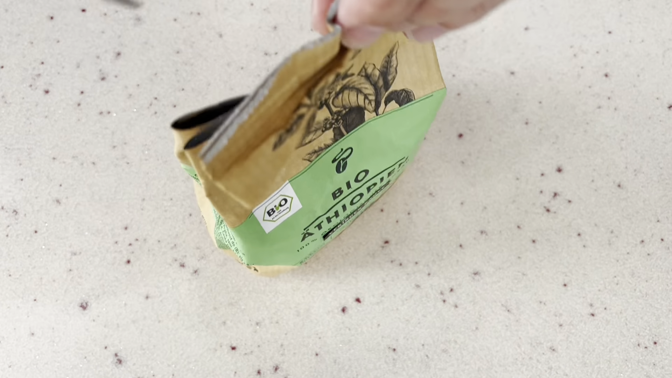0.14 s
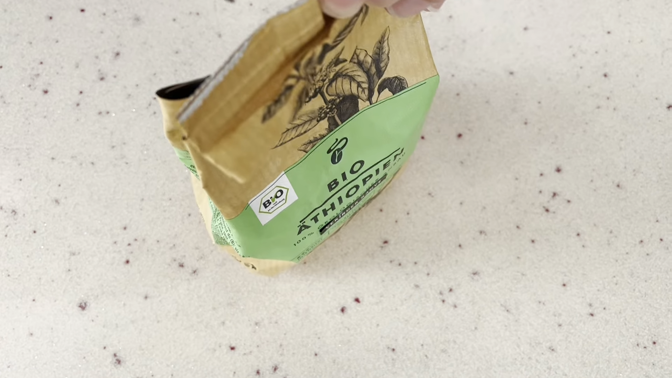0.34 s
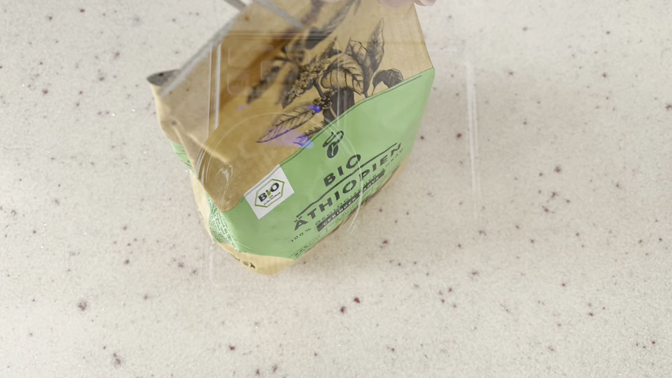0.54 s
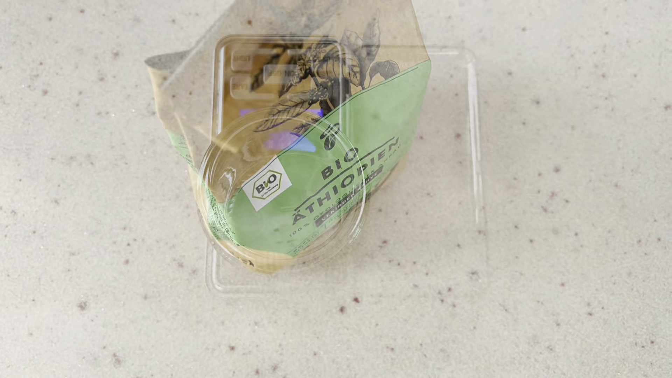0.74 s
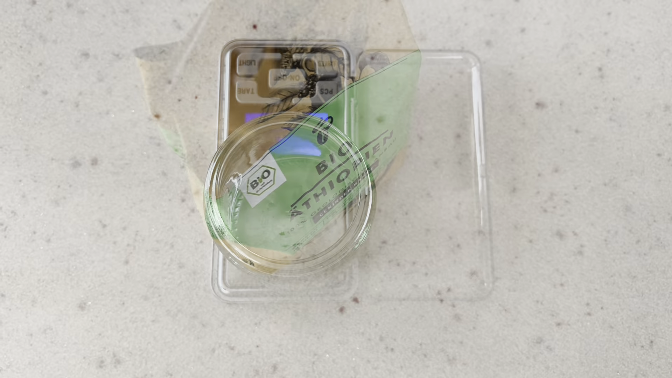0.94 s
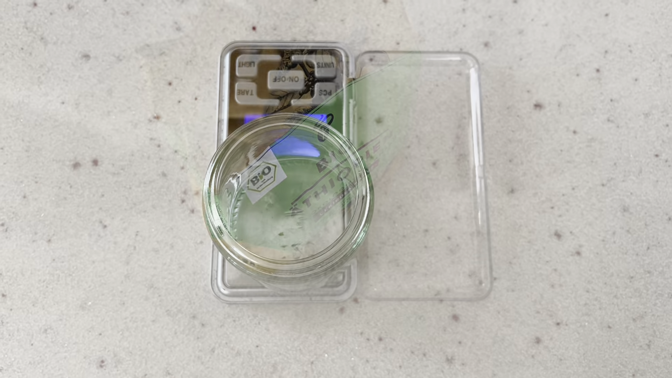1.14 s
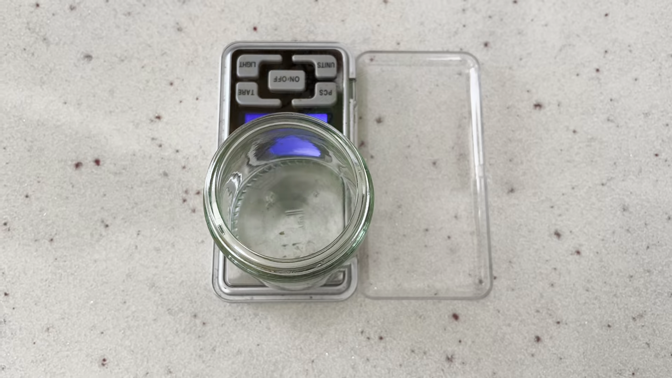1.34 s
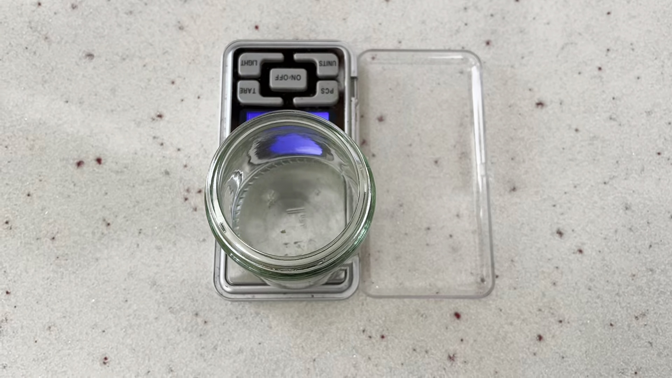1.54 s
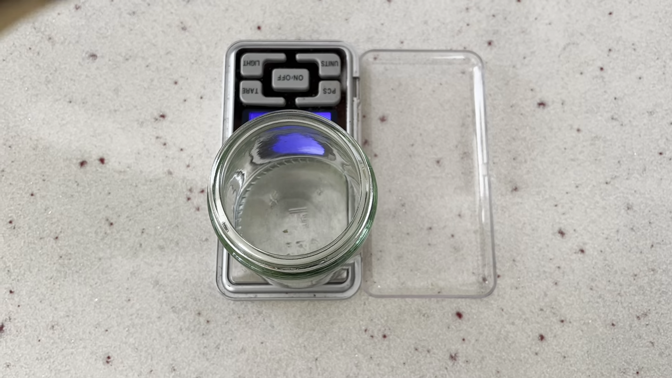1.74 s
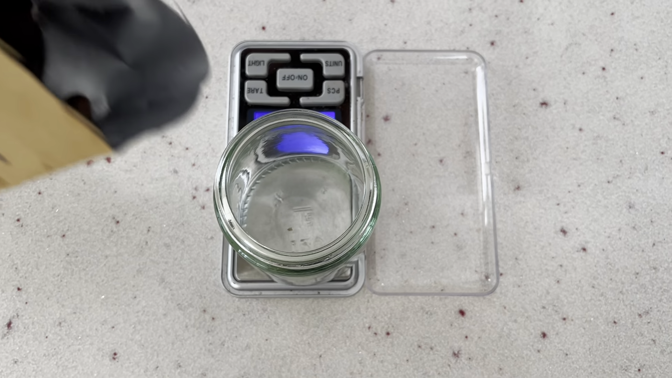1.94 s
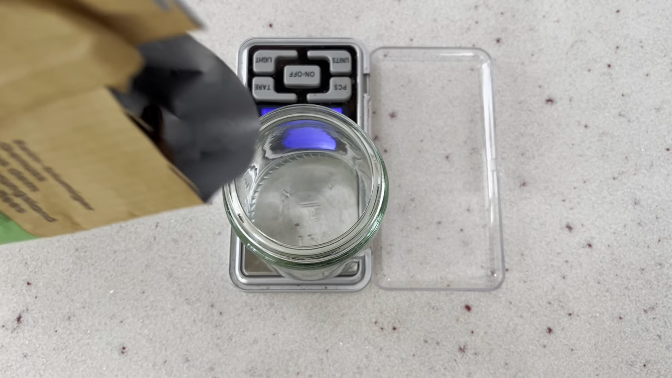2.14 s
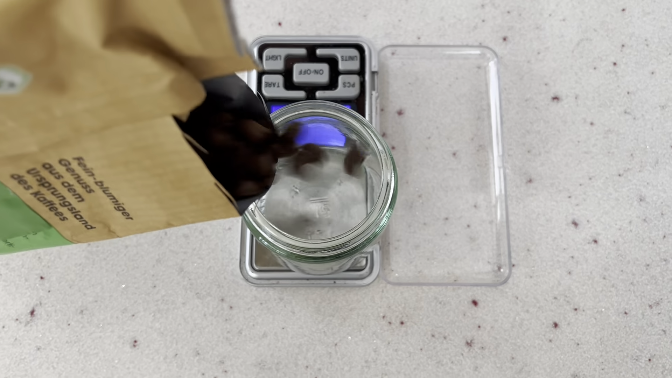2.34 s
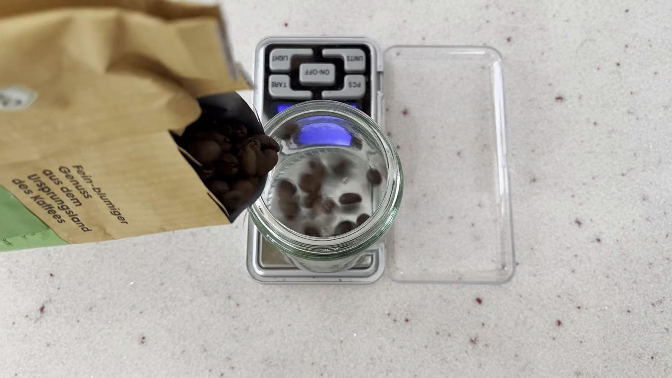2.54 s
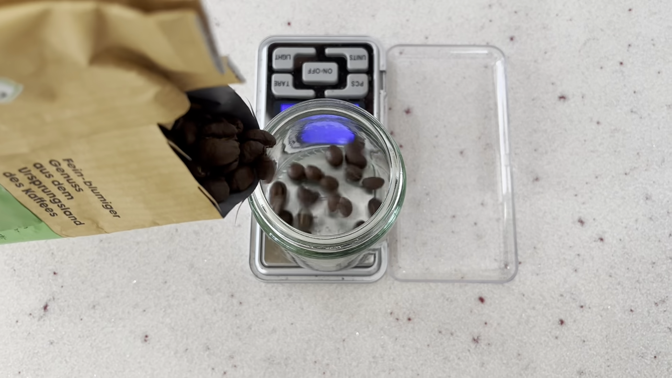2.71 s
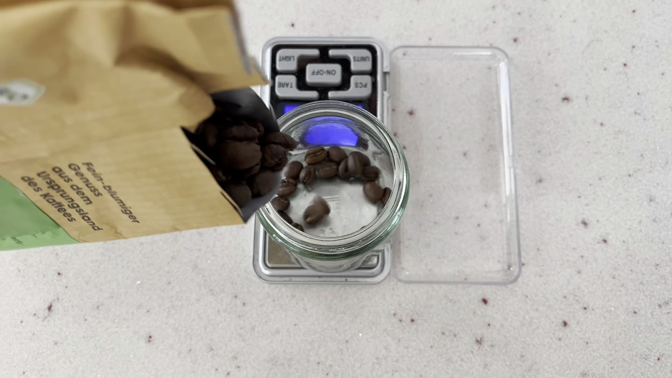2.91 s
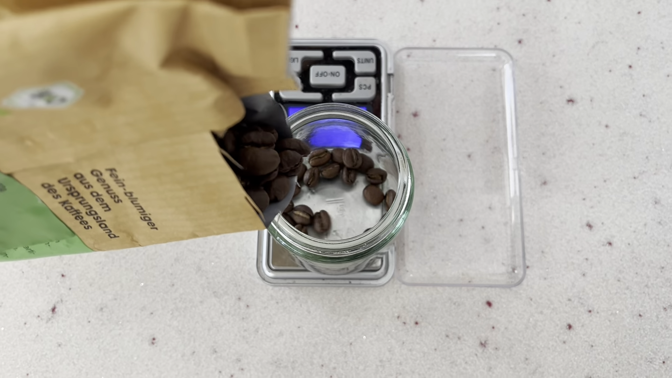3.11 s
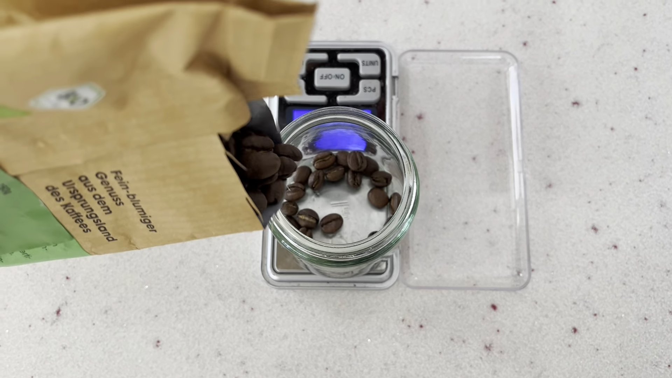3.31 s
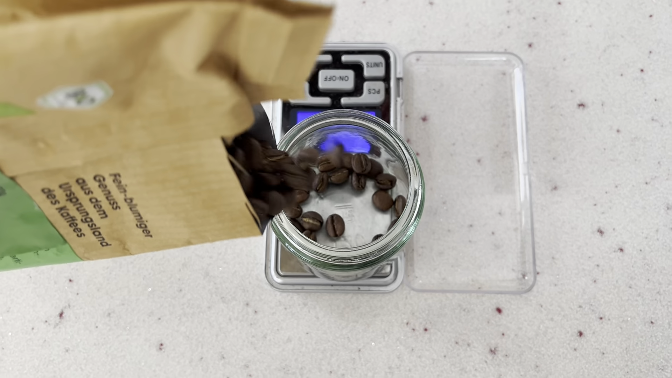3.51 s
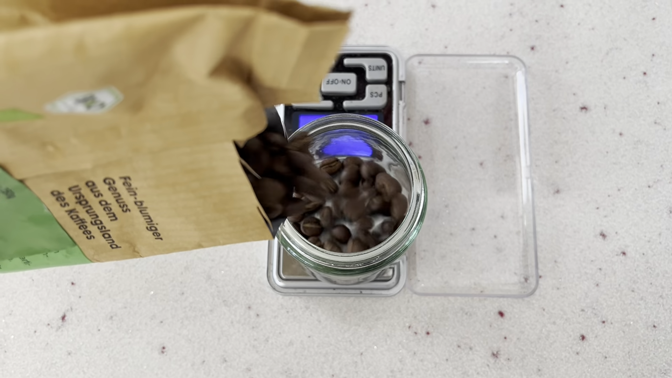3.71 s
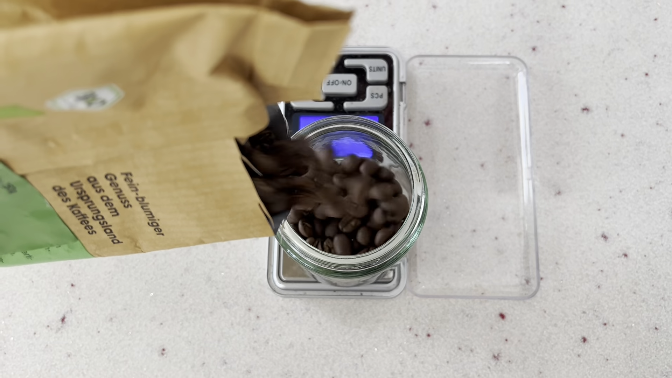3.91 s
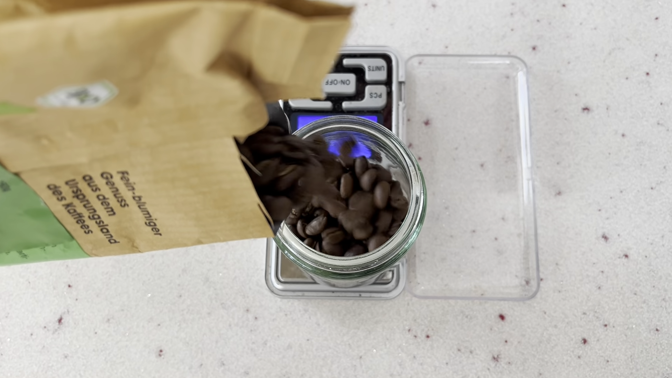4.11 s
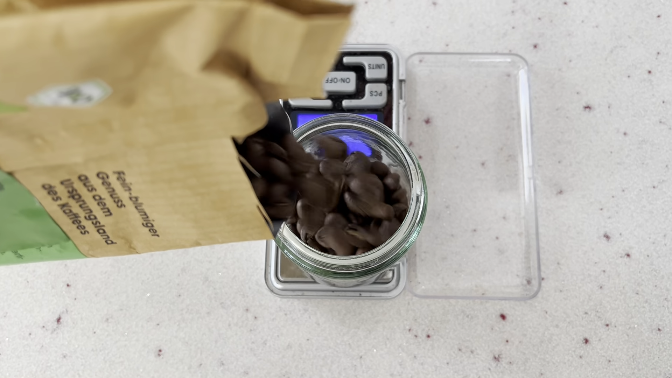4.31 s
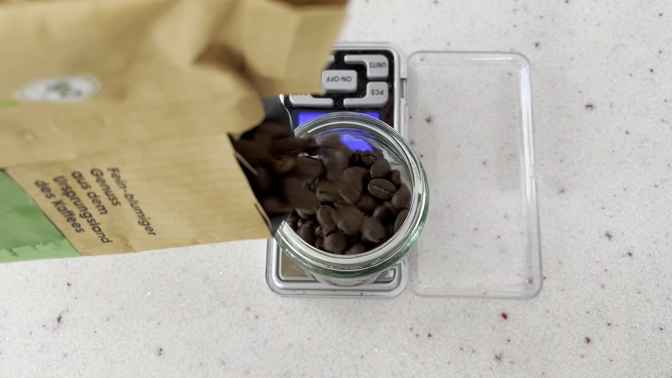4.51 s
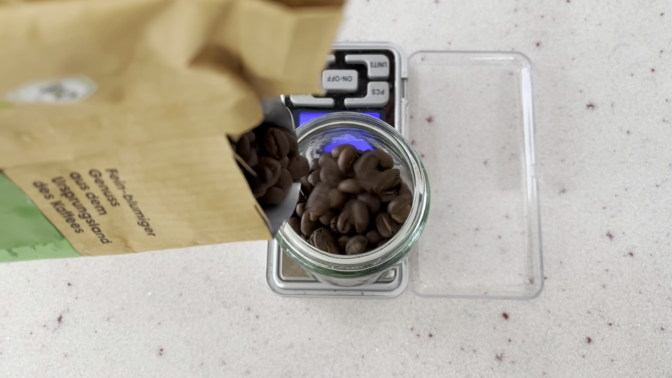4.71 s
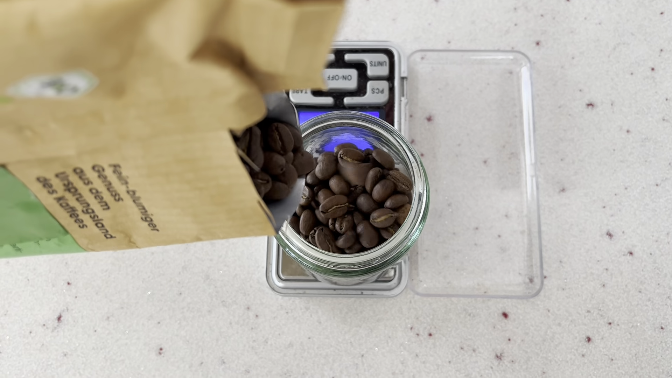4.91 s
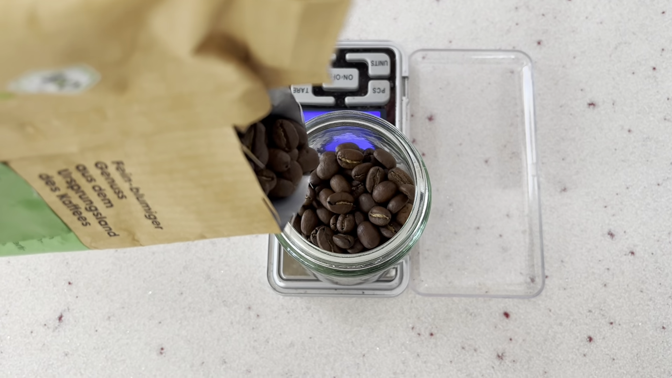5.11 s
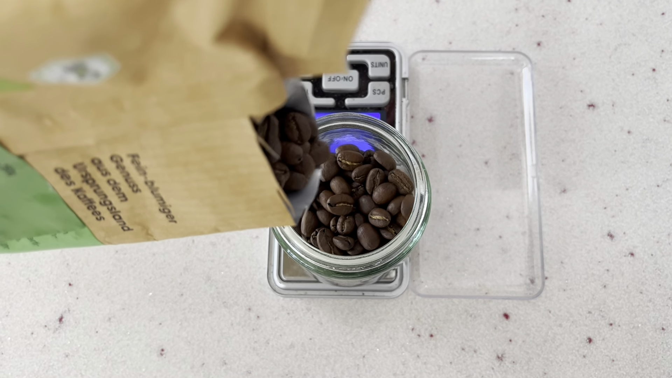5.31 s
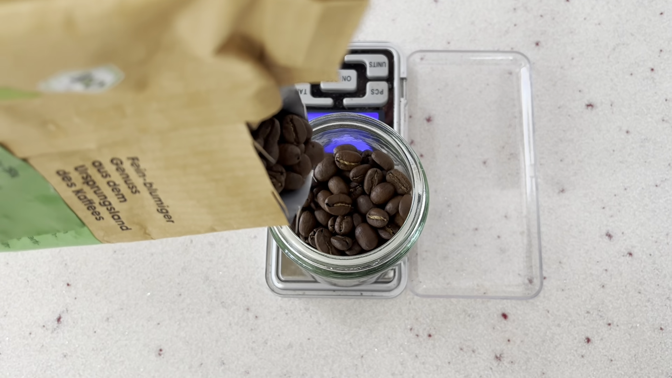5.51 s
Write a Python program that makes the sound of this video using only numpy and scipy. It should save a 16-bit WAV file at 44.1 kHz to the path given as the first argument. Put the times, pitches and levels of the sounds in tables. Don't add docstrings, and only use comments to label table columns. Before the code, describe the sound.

Close stereo pickup of coffee beans going from a crackly paper bag into a small glass jar on a worktop. Quiet finger strokes come first, then louder folding and sliding beans. A brief dense clatter rings the empty glass, a few beans roll to rest, then a second, longer gush fills it, its ring fading into dry clicks. Last beans settle and paper crackles softly in the quiet, barely reverberant kitchen.

```python
import sys
import numpy as np
from scipy import signal
from scipy.fft import rfft, irfft, next_fast_len
from scipy.io import wavfile
from scipy.ndimage import map_coordinates

SR = 44100
rng = np.random.default_rng(int(sys.argv[2]) if len(sys.argv) > 2 else 0)


def transcribe(u):
    v = np.clip(np.atleast_2d(u).T, -1, 1)
    q = np.round(v * 32767).astype(np.int16)
    wavfile.write(sys.argv[1], SR, q)


def amplitude_ratio(level_db):
    exponent = np.asarray(level_db, float) / 20
    return 10 ** exponent


N = 244755
TIME_S = np.arange(N) / SR

# start_s, click_db, base_ring_db after it
FIRST_POUR = [(2.3481, -18.5, -42.5), (2.3901, -20, -39), (2.407, -12.5, -19), (2.4519, -11.5, -27),
              (2.4579, -11.5, -18.5), (2.4619, -16, -9), (2.4669, -18, -16.5), (2.4739, -13, -19),
              (2.4799, -27.5, -18), (2.4839, -18, -13), (2.4873, -17, -13.5), (2.4923, -12, -21.5),
              (2.5028, -5.5, -27), (2.5063, -16.5, -27), (2.5113, -17, -31.5), (2.5238, -20.5, -26.5),
              (2.5337, -24, -28.5), (2.5377, -14.5, -9), (2.5417, -6, -8.5), (2.5502, -20.0, -15.5),
              (2.5682, -19, -15), (2.5791, -11, -11.5), (2.5946, -12, -27.5), (2.6031, -18, -23.5),
              (2.6215, -12.5, -19.5), (2.627, -24.5, -21.0), (2.638, -25, -17), (2.642, -10.0, -7),
              (2.645, -34, -24.5), (2.6485, -23, -21), (2.66, -23.5, -27.5), (2.6739, -31.0, -21),
              (2.6859, -23.5, -28.5), (2.6919, -38.5, -20), (2.7014, -27.0, -39.5), (2.7083, -21.5, -22.5),
              (2.7143, -23.5, -15), (2.7183, -23.0, -17), (2.7288, -23.5, -18), (2.7353, -14.5, -13),
              (2.7572, -14, -22), (2.7607, -19, -12.5), (2.7672, -21, -28), (2.7767, -20.5, -15.5),
              (2.7941, -19.5, -19.5), (2.8021, -21.5, -21.0), (2.8206, -26, -29.5), (2.8435, -26.5, -23.5),
              (2.8525, -12, -8.5), (2.8675, -28, -16), (2.878, -17.5, -25), (2.8934, -37, -23)]
SECOND_POUR = [(3.5564, -23, -18.5), (3.5594, -23, -13.5), (3.5809, -17, -15), (3.5968, -16.5, -21.5),
               (3.6053, -15.5, -13), (3.6327, -14.5, -16), (3.6357, -15.5, -6.5), (3.6397, -20, -21.5),
               (3.6432, -30, -9), (3.6462, -13.5, -8.5), (3.6492, -23.5, -15), (3.6617, -19, -16.0),
               (3.6707, -22, -15.5), (3.6816, -29.5, -18), (3.6881, -18.5, -18.0), (3.6971, -22, -30),
               (3.7051, -25.5, -24.5), (3.7106, -8.5, -20.5), (3.7136, -13.5, -11.0), (3.731, -19, -25.5),
               (3.734, -26.5, -12), (3.7385, -20.5, -13.0), (3.743, -10, -9.5), (3.7704, -17, -27),
               (3.7754, -23.5, -18.5), (3.7854, -27, -20), (3.7994, -16, -15.5), (3.8029, -25, -34),
               (3.8088, -24.5, -21), (3.8188, -11, -17.5), (3.8238, -28.5, -12.5), (3.8283, -18.5, -23.5),
               (3.8423, -19.5, -22), (3.8453, -17, -14), (3.8498, -14.5, -13.5), (3.8557, -10.5, -20),
               (3.8607, -17.5, -22), (3.8692, -27, -36.5), (3.8772, -26.5, -21), (3.8877, -32.5, -18),
               (3.8907, -12.5, -17), (3.8976, -14.5, -17), (3.9091, -30, -32), (3.9161, -27.5, -24.5),
               (3.9301, -16.5, -22.5), (3.9356, -22, -15.0), (3.94, -28.5, -28), (3.944, -11.5, -23.5),
               (3.955, -17.5, -24), (3.968, -15.5, -20.0), (3.972, -23, -17), (3.9854, -22.5, -20),
               (3.9929, -11, -33), (4.0024, -14.5, -17), (4.0134, -14, -32.5)]
# start_s, click_db, base_ring_db after it
ON_PILE = [(4.0199, -26.5, -33), (4.0254, -24.5, -39), (4.0313, -10, -25.5), (4.0383, -23, -23.5),
           (4.0503, -20.0, -31.5), (4.0538, -26, -19), (4.0598, -19.5, -26), (4.0648, -17.5, -14.5),
           (4.0683, -12.5, -31), (4.0712, -28.5, -35), (4.0767, -28.5, -28.5), (4.0902, -20.5, -31),
           (4.0962, -20.5, -25.0), (4.1002, -31, -22.0), (4.1112, -22.5, -41), (4.1236, -22.5, -32.5),
           (4.1291, -21, -27.5), (4.1326, -30, -25.5), (4.1406, -25, -39), (4.164, -24.5, -32),
           (4.1725, -16.5, -34.5), (4.1775, -22, -33), (4.1805, -11.5, -32.5), (4.1965, -29.5, -37.5),
           (4.2044, -24.5, -35), (4.2134, -20.0, -37), (4.2244, -24, -27.5), (4.2274, -14.5, -24.5),
           (4.2434, -29.0, -50), (4.2558, -38.5, -44), (4.2588, -17.5, -30.5), (4.2688, -24.5, -37),
           (4.2783, -19.5, -40.5), (4.2813, -15.5, -34.5), (4.2917, -21.5, -39.0), (4.2972, -20.5, -37),
           (4.3012, -13.5, -34), (4.3082, -10, -27), (4.3401, -28.5, -43), (4.3541, -26.0, -31),
           (4.3616, -24, -33.5), (4.3706, -11.5, -27.5), (4.379, -22.5, -32), (4.3825, -19, -30),
           (4.3905, -16.5, -38.5), (4.395, -17.5, -35.5), (4.401, -18, -27.5), (4.408, -27, -25),
           (4.4135, -20, -33), (4.4175, -21.5, -27), (4.4439, -21, -35), (4.4619, -14, -39.5),
           (4.4768, -21, -37.5), (4.4868, -19.5, -36.5), (4.5068, -25, -41.5)]
SETTLING = [(4.5525, -16.5, -53), (4.5623, -20, -48.5), (4.595, -25, -47), (4.6038, -16.5, -49),
            (4.6105, -24, -37), (4.6213, -14.5, -38), (4.637, -27, -61.5), (4.6427, -23.5, -40),
            (4.6469, -20, -51), (4.6655, -18, -53), (4.6702, -37, -57), (4.6742, -19.5, -62),
            (4.6782, -30.5, -53), (4.7037, -27.5, -43), (4.7089, -26, -61), (4.7157, -14.5, -31),
            (4.7215, -18.5, -45), (4.7274, -38, -40), (4.7416, -30, -62), (4.7512, -37, -57),
            (4.7618, -33, -56), (4.7659, -26, -68), (4.772, -44, -94), (4.7844, -20.5, -54),
            (4.7888, -22, -74), (4.7933, -27, -55), (4.802, -25.5, -56), (4.8124, -40, -67),
            (4.8825, -53, -61), (4.9157, -27.5, -79), (4.9746, -24.5, -68), (5.021, -36, -66)]
# start_s, click_db
ROLLING = [(2.885, -22.5), (2.9228, -31), (2.9332, -32), (2.9379, -37), (2.9468, -23.5), (2.9638, -30.5),
           (2.9877, -49), (2.9985, -45.5), (3.0044, -34), (3.0322, -41), (3.0358, -39)]
# time_s, strength_db
FLOW = [
    [(2.4, -62), (2.63, -53.5), (2.74, -53.5), (2.92, -65.5), (3.05, -64), (3.1, -79)],
    [(3.555, -41.5), (3.62, -55), (3.73, -48), (3.93, -48.5), (4.1, -44.5), (4.25, -47), (4.31, -47)],
    [(4.338, -39.5), (4.41, -50), (4.47, -49), (4.538, -57)],
    [(4.551, -41.5), (4.59, -49.5), (4.63, -46), (4.72, -51), (4.772, -57)],
    [(4.784, -55.5), (4.84, -81)],
]
# pitch_hz, width_hz, level_db
SHIVER = [(8820, 92.3, -12.5), (9740, 310, -2), (9500, 150, -26), (10600, 120, 1.5), (15000, 280, 11)]
# pitch_hz, width_hz, level_db
JAR_AIR = [(340, 40, 10)]
# start_s, lobe_ring_db, twin_ring_db after it
WALL_BLOWS = [(2.35, -37, -35), (2.365, -34, -42.5), (2.412, -35, -39.5), (2.488, -34, -49),
              (2.544, -39, -51.5), (2.64, -42, -52.0), (2.676, -45.0, -52), (2.75, -43, -53),
              (2.806, -47.5, -53), (3.56, -44, -52), (3.66, -48.5, -59), (3.712, -44.5, -50.5),
              (3.753, -43.5, -49), (3.849, -39, -55), (3.95, -37.5, -48), (4.005, -41, -48),
              (4.045, -36, -47.5), (4.129, -40, -42.5), (4.218, -48, -54.5), (4.286, -44.0, -58),
              (4.35, -36, -52), (4.412, -37, -40), (4.466, -41, -47), (4.548, -47, -49),
              (4.625, -53, -54.5), (4.669, -42.5, -51), (5.016, -56, -60.5)]
# start_s, level_db
KNOCKS = [
    (2.852, -33),
    (4.783, -37.5),
]
# time_s, level_db
CRUMPLE = [(1.22, -63.5), (1.33, -44), (1.459, -38), (1.55, -45.5), (1.68, -56), (1.8, -71), (1.96, -56),
           (2.03, -43.5), (2.272, -30.5), (2.6, -44), (2.85, -65), (3.2, -77.5), (3.52, -49), (3.75, -43.5),
           (4.62, -45.5), (4.84, -53), (5.2, -83), (5.55, -62.5)]
# start_s, peak_db, treble_share_db
FINGERED_SNAPS = [(0.099, -45, 5), (0.123, -33, 3.5), (0.139, -29.5, -28), (0.153, -42.5, -16),
                  (0.191, -28, 1.5), (0.207, -37, -25), (0.227, -34, -2.5), (0.34, -42.5, -31),
                  (0.57, -45, -31), (0.6595, -30, -7.5), (0.939, -43, -8), (0.947, -47, -11.5),
                  (0.968, -35, -6), (0.989, -48.5, 8), (0.997, -46, 2), (1.113, -18.5, 0),
                  (1.209, -43, -34)]
TIPPED_SNAPS = [(1.252, -31, -38.5), (1.333, -17.5, -16), (1.351, -23, -26), (1.376, -28, -31.5),
                (1.419, -13, -20), (1.441, -15, -18), (1.496, -7, -19), (1.513, -20, -27),
                (1.558, -34, -36), (1.634, -24, -12), (1.652, -19.5, -15), (1.73, -38, -6),
                (1.741, -46.5, -4.5), (1.757, -33.5, -24.5), (1.787, -36.5, -13.5), (1.805, -43.5, -5.5),
                (1.828, -38.5, -7.5), (1.859, -34.5, -9), (1.901, -55, -31), (1.911, -29, -4.5),
                (1.967, -47, 3.5), (1.995, -15.5, -14), (2.03, -23, -22.5), (2.132, -15.5, -20),
                (2.163, -17.5, -15), (4.811, -23.5, -2), (4.875, -24.5, -10), (4.892, -45, 3),
                (4.915, -28, -6.5), (5.269, -66, 11), (5.389, -41.5, -25), (5.535, -34, -40),
                (5.545, -27.5, -27)]
# start_s, peak_db, panel_hz
TAPS = [(1.112, -16, 1470), (1.113, -46, 734), (1.115, -24.5, 300), (1.41, -18, 945), (1.455, -11, 900),
        (1.496, -19, 954), (1.996, -10.5, 1053), (2.028, -20, 1100), (2.044, -15, 1000), (2.052, -15, 1180),
        (2.132, -17.5, 1100), (2.163, -9.5, 1060), (2.194, -8.5, 1173), (2.356, -19, 1050)]
TUMBLES = [(3.401, -33, 1034), (3.454, -40.5, 1274), (3.485, -24.5, 1030), (3.559, -27, 1070),
           (3.736, -32, 1240), (3.841, -40, 1060), (3.933, -29, 945), (3.984, -45.5, 1030),
           (4.059, -17, 1000), (4.094, -28, 910), (4.156, -20.5, 1000), (4.201, -21, 1000),
           (4.236, -19.5, 970), (4.339, -27, 960), (4.455, -26, 895), (4.665, -43, 1090),
           (4.705, -33, 1010)]
# pitch_hz, width_hz, level_db
LIFTED_HOLLOW = [(265, 113, 0), (940, 92, 8), (1493, 340, 0), (1935, 600, -3.5), (2600, 210, -3),
                 (3310, 41, -7.5), (3320, 62, -11.5), (4086, 1100, -7.5)]
TIPPED_HOLLOW = [(286, 110, 0.5), (1090, 372, 1), (1214, 20, -17), (1670, 125, -19), (2450, 260, -5.5),
                 (3000, 434, -7.5), (4180, 480, -7.5)]
# start_s, peak_db, panel_hz
STROKES = [(0, -56, 1580), (0.108, -52, 1800), (0.254, -53, 1200), (.4, -67.5, 550), (.68, -59, 426),
           (0.759, -64.5, 427), (0.855, -51, 2300), (.98, -61.5, 1350), (1.05, -71, 1510),
           (1.13, -53, 1520), (1.18, -61.5, 2450)]
# start_s, length_s, pitch_hz, level_db
HUMS = [
    (0.22, .22, 572, -67.5),
    (0.665, 0.21, 444, -61),
    (0.83, 0.04, 2280, -59.5),
    (0.84, 0.048, 1160, -62),
    (5.212, 0.17, 617, -71),
]
# start_s, level_db, pitch_hz
BUMPS = [
    (0.226, -42.5, 107),
    (0.663, -50, 95.5),
    (0.995, -46, 119),
    (5.298, -52.5, 95),
]
# freq_hz, level_db
CLICK = [(500, -11), (2000, -17), (5000, -15), (7000, -3), (8500, -1), (10500, 5), (13000, 6),
         (15800, -3.5), (16700, -15)]
FLAT_PAPER = [(150, 1.5), (400, 1.5), (1500, 1), (4500, -4.5), (6000, -1), (10000, -12), (16000, -17.5)]
RATTLE = [(1500, -102), (3000, 2.5), (5000, 4.5), (7000, 11), (9000, 6), (11500, 8), (14000, 5.5),
          (15800, 2.5), (16300, -33)]
ROOM_TONE = [(20, -30.5), (32, -23.5), (50, -0.5), (100, -9), (250, -13.5), (400, -21.5), (1000, -28.5),
             (2500, -41.5), (6000, -43.5), (9000, -53.5), (12000, -78), (16000, -85.5)]
# freq_hz, right_lead_rad
PORT_TURN = [(0, 0), (1200, -.9), (1550, -1.5), (2150, .3), (3360, -1.1), (4200, -1.7), (5000, 0),
             (5680, 2.2), (6800, 3.7), (8350, 6), (9650, 6.4), (12000, 8.9), (13700, 10), (15200, 12)]
# freq_hz, left_minus_right_db
PORT_TILT = [(200, -0.5), (700, 10.5), (1100, 12), (2000, 6.5), (2800, 4), (4200, 11), (6000, 10.5),
             (9000, -1.5)]
# freq_hz, t60_s
KITCHEN = [(200, 0.11), (2000, 0.29), (8000, 0.021), (16000, 0.05)]

# pitch_hz, t60_s
BASE, WALL, TWIN, RIM = (9074, 0.115), (4243, 0.28), (4256, 0.24), (10955, 0.1)
COVERED_S = 3.8


def unit(x):
    return x / np.sqrt(np.mean(x ** 2) + 1e-20)


def along(points, hz):
    f, v = np.transpose(points)
    return np.interp(np.log(hz + 1), np.log(f + 1), v)


def filtered(x, response):
    m = next_fast_len(N + SR // 4)
    hz = np.fft.rfftfreq(m, 1 / SR)
    return irfft(rfft(x, m) * response(hz), m)[..., :N]


def coloured(x, spectrum):
    return filtered(x, lambda hz: amplitude_ratio(along(spectrum, hz)))


def resonant(x, modes):
    def response(f):
        total = 0
        for k, (centre, width, db) in enumerate(modes):
            band = 1j * f * width
            total = total + (-1) ** k * amplitude_ratio(db) * band / (centre * centre - f * f + band)
        return total
    return filtered(x, response)


def scatter(times, rows):
    at = np.round(np.asarray(times) * SR).astype(int)[:, None] + np.arange(rows.shape[1])
    return np.bincount(at.ravel(), rows.ravel(), N + rows.shape[1])[:N]


def bursts(times, db, t60, tail_db, tail_t60, size=2000, rise=1e-5):
    t = np.arange(size) / SR
    shape = amplitude_ratio(-60 * t / t60) + amplitude_ratio(tail_db - 60 * t / tail_t60)
    shape = shape * (1 - np.exp(-t / rise))
    rows = shape * rng.standard_normal((len(times), size))
    rows *= np.linalg.norm(shape) / np.linalg.norm(rows, axis=1, keepdims=True)
    return scatter(times, amplitude_ratio(db)[:, None] * rows)


def grains(count, spread_db, top_db, t60):
    draw = rng.random((count, 2))
    size_db = np.minimum(-spread_db * np.log(draw[:, 1]), top_db)
    return unit(bursts(draw[:, 0] * N / SR, size_db, t60, -40, t60, size=300, rise=0.00063))


def beans():
    ringing_s, ringing_db, base_db = contacts()
    rolling_s, rolling_db = np.transpose(ROLLING)
    stray_s, stray_db = strays(flow(), count=700)
    s = np.r_[ringing_s, rolling_s, stray_s]
    click_db = np.r_[ringing_db, rolling_db, stray_db]

    cracks = [bursts(s[k::2], click_db[k::2] + 8.5, 0.0014, -17.5, 0.026, size=900, rise=0.00022)
              for k in (0, 1)]
    clicks = coloured(np.array(cracks), CLICK)
    sides = clicks + amplitude_ratio(-6.0) * resonant(clicks, SHIVER)

    t = TIME_S[:300]
    chirp_hz = rng.uniform(9500, 11450, (len(s), 1))
    chirp_level = amplitude_ratio(click_db[:, None] - 10 - 60 * t / 0.0056)
    chirps = scatter(s, chirp_level * np.sin(2 * np.pi * chirp_hz * t))

    base_t60 = np.interp(ringing_s, [COVERED_S, 4.3], [BASE[1], 0.055])
    base = ring((BASE[0], base_t60), ringing_s, base_db, 0.0005).real
    air = resonant(clicks.sum(0), JAR_AIR) * np.clip((TIME_S - COVERED_S) / 0.11, 0, 1)

    spread = 0.032
    middle = chirps + base + air + knocks()
    return ports(sides[0], 1 - spread, 0.3) + ports(sides[1], 1 + spread, 0.18) + ports(middle, 1, 0.21)


def contacts():
    s, click_db, base_db = 2.8528, -24, -13
    flight_s, shrink, loss_db = 0.099, 0.6, 4
    bounces = []
    for k in range(1, 5):
        landing_s = s + flight_s * (1 - shrink ** k) / (1 - shrink)
        bounces.append((landing_s, click_db - loss_db * k, base_db - loss_db * k))
    return np.transpose(list(FIRST_POUR) + bounces + list(SECOND_POUR) + list(ON_PILE) + list(SETTLING))


def flow():
    gushes = [np.interp(TIME_S, *np.transpose(gush), left=-120, right=-120) for gush in FLOW]
    return np.max(gushes, axis=0)


def strays(flow_db, count):
    draw = rng.random((count, 2))
    s = np.sort(draw[:, 0]) * (N - 1) / SR
    return s, flow_db[(s * SR).astype(int)] + 25 - 20 * draw[:, 1]


def ring(mode, times, level_db, rise):
    hz, t60 = mode[0], mode[1] + 0 * times
    carried_db = level_db[:-1] - 60 * np.diff(times) / t60[:-1]
    change = np.clip(abs(level_db[1:] - carried_db) / 8, 0, 1)
    jump = change * rng.uniform(-np.pi, np.pi, len(carried_db))
    phase = np.cumsum(np.r_[0, jump])
    last = np.clip(np.searchsorted(times, TIME_S) - 1, 0, None)
    level = amplitude_ratio(level_db[last] - 60 * (TIME_S - times[last]) / t60[last]) * (TIME_S > times[0])
    swing = level * np.exp(1j * phase[last])
    swing = signal.lfilter([1 / (rise * SR)], [1, 1 / (rise * SR) - 1], swing)
    return swing * np.exp(2j * np.pi * hz * TIME_S)


def wall():
    s, lobe_db, twin_db = np.transpose(WALL_BLOWS)
    lobes = ring(WALL, s, lobe_db + 2.0, 0.002).real + amplitude_ratio(6.5) * grazes(WALL)
    twin = ring(TWIN, s, twin_db + 3.5, 0.002).real + grazes(TWIN)
    climb_db = np.interp(s, [2.4, 4.2, 5], [-6, 0, 14])
    rim = ring(RIM, s, twin_db + climb_db, 0.0026).real
    return lobes * [[1], [-1]] + twin + ports(rim, 0.9, 0.1)


def grazes(mode):
    hz, t60 = mode
    s, db = strays(flow(), count=500)
    t = TIME_S[:8000]
    return scatter(s, amplitude_ratio(db[:, None] - 26 - 60 * t / t60) * np.sin(2 * np.pi * hz * t))


def knocks():
    out, t = np.zeros(N), TIME_S[:4000]
    for s, db in KNOCKS:
        cycles = 250 * t + 1.5 * (1 - np.exp(-t / 0.0028))
        push = amplitude_ratio(-60 * t / 0.061) * np.sin(2 * np.pi * cycles)
        thud = amplitude_ratio(-6.5 - 60 * t / 0.11) * np.sin(2 * np.pi * 110 * t)
        out[round(s * SR):][:len(t)] = amplitude_ratio(db) * (push + thud)
    s, db = np.transpose(KNOCKS)
    clack = bursts(s, db + 17.0, 0.003, -9.0, 0.045, rise=0.00061)
    return out + resonant(clack, [(2300, 730, -2.0), (3600, 260, 2.0)])


def bag():
    crackle = grains(count=4000, spread_db=1.5, top_db=17.5, t60=0.017) + 0.14 * rng.standard_normal(N)
    rattle = grains(count=4500, spread_db=6.5, top_db=17, t60=0.003)
    hiss = np.interp(TIME_S, [1.55, 1.6, 2, 2.15, 2.35, 2.45], [0.7, 0.15, 0.15, 1.2, 1.2, 0.2])
    rattle += hiss * rng.standard_normal(N)

    row, place = [0 * TIME_S, 0 * TIME_S + 1], [TIME_S * 40] * 2
    clump_db = 1.8 * map_coordinates(rng.standard_normal((2, 400)), [row, place])

    crumple_db = np.interp(TIME_S, *np.transpose(CRUMPLE), left=-120)
    crumple = amplitude_ratio(crumple_db + 1 + clump_db[0]) * unit(hollow(crackle))
    paper_level = amplitude_ratio(-49 + 1.06 * (crumple_db + 42.0))
    stream_level = amplitude_ratio(flow() + 5.5)
    fine = amplitude_ratio(clump_db[1]) * np.hypot(paper_level, stream_level) * unit(coloured(rattle, RATTLE))

    def thin(x):
        return filtered(hollow(x), lambda hz: amplitude_ratio(1.5) / (1 + (450 / (hz + 1)) ** 2))
    return crumple + fine + snaps(TIPPED_SNAPS, thin) + taps()


def hollow(x):
    tip = np.interp(TIME_S, (1.8, 1.98), [0, np.pi / 2])
    both = np.cos(tip) * resonant(x, LIFTED_HOLLOW) + np.sin(tip) * resonant(x, TIPPED_HOLLOW)
    return filtered(both, lambda hz: 1 / (1 + (hz / 5000) ** 4))


def snaps(table, body):
    s, db, treble_db = np.transpose(table)
    crack = bursts(s, db + 18, 0.01, -23.5, 0.06, rise=0.0061)
    crack += scatter(s + 0.00082, amplitude_ratio(db - 0.5)[:, None] * signal.windows.hann(8))
    tick = bursts(s, db + treble_db + 9.5, 0.0095, -30, 0.027, rise=0.0048)
    return body(crack) + coloured(tick, RATTLE)


def taps():
    s, db, hz = np.transpose(list(TAPS) + list(TUMBLES))[..., None]
    t = TIME_S[:1200]
    level = amplitude_ratio(db - 60 * t / 0.012) * (1 - np.exp(-t / 0.00159))
    return scatter(s[:, 0], level * np.sin(2 * np.pi * hz * t))


def fingering():
    def flat(x):
        return coloured(x, FLAT_PAPER)
    brush = grains(count=6000, spread_db=4, top_db=10, t60=0.004) + 0.6 * rng.standard_normal(N)
    brush = unit(flat(brush))
    rise_db_per_s, fall_db_per_s = 525, 246
    strokes = np.zeros(N)
    for s, db, panel_hz in STROKES:
        below_peak_db = np.maximum(rise_db_per_s * (s - TIME_S), fall_db_per_s * (TIME_S - s))
        stroke = brush * amplitude_ratio(db - below_peak_db)
        panel = signal.lfilter(*signal.iirpeak(panel_hz, 7, SR), amplitude_ratio(-11) * stroke)
        strokes += stroke + panel
    return strokes + snaps(FINGERED_SNAPS, flat)


def handling():
    out = np.zeros(N)
    for s, length, hz, db in HUMS:
        hum = unit(resonant(rng.standard_normal(N), [(hz, 18, 0)]))
        out += amplitude_ratio(db) * hum * np.sin(np.pi * np.clip((TIME_S - s) / length, 0, 1)) ** 0.5
    s, db, hz = np.transpose(BUMPS)[..., None]
    t = TIME_S[:3000]
    level = amplitude_ratio(db - 60 * t / 0.11) * (1 - np.exp(-t / 0.0041))
    return out + scatter(s[:, 0], level * np.sin(2 * np.pi * hz * t))


def ports(x, side, tilt):
    half = np.array([[-0.5], [0.5]])

    def response(hz):
        turn = np.exp(1j * side * half * np.interp(hz, *np.transpose(PORT_TURN)))
        return turn * amplitude_ratio(-tilt * half * along(PORT_TILT, hz))
    return filtered(x, response)


def kitchen(x):
    hz, t, z = signal.stft(rng.standard_normal((2, SR // 2)), SR, nperseg=256)
    decay = amplitude_ratio(-60 * t / along(KITCHEN, hz)[:, None])
    tail = signal.istft(z * decay, SR, nperseg=256)[1]
    late = np.pad(x, (150, 0))[None]
    return signal.fftconvolve(late, tail / np.linalg.norm(tail[0]), axes=1)[:, :N]


def room_tone():
    def alike(hz):
        return 1 / (1 + (hz / 500) ** 2)
    shared = filtered(rng.standard_normal(N), lambda hz: np.sqrt(alike(hz)))
    own = filtered(rng.standard_normal((2, N)), lambda hz: np.sqrt(1 - alike(hz)))
    return amplitude_ratio(-56.0) * unit(coloured(shared + own, ROOM_TONE))


def scene():
    early, late, glass = fingering() + handling(), bag(), beans()
    direct = ports(early, -1.08, 0.026) + ports(late, 0.99, 0.5) + glass + wall()
    paper_room = amplitude_ratio(-15) * kitchen(early) + amplitude_ratio(-13.5) * kitchen(late)
    glass_room = amplitude_ratio(-20) * kitchen(glass[0])
    return direct + paper_room + glass_room + room_tone()


def top_cut(x):
    return signal.sosfilt(signal.butter(12, 17150, fs=SR, output="sos"), x)


def record(dry):
    mix = filtered(dry, lambda hz: amplitude_ratio(-11 - 10.63 * np.tanh((hz - 15850) / 60)))
    return top_cut(mix)


dry = scene()
out = record(dry)
transcribe(out)
```